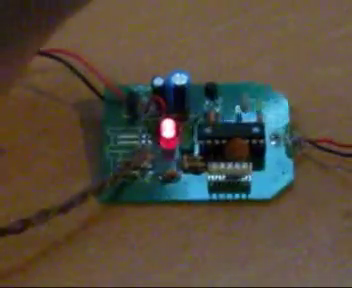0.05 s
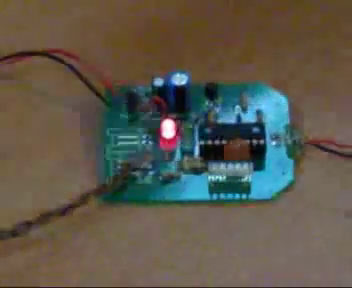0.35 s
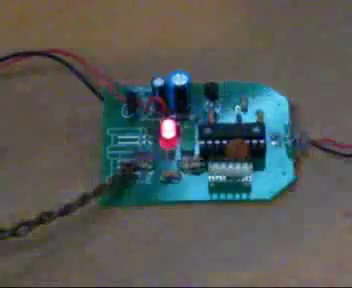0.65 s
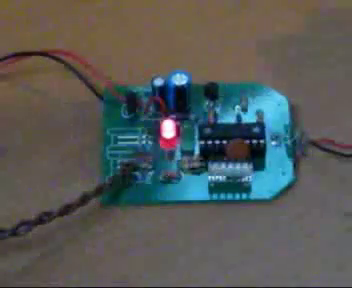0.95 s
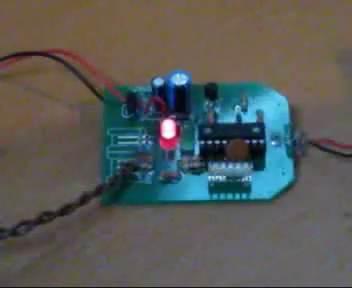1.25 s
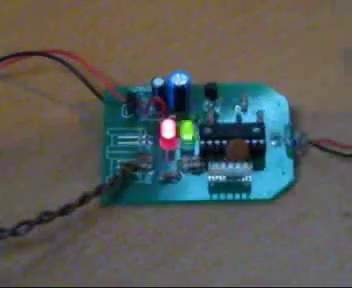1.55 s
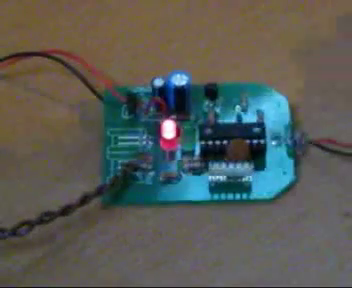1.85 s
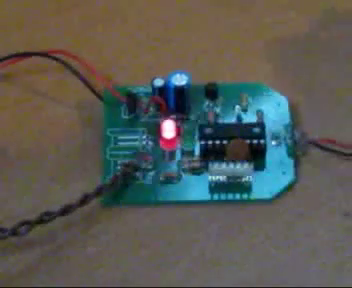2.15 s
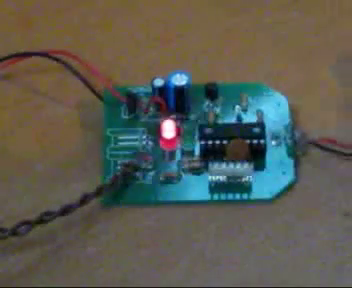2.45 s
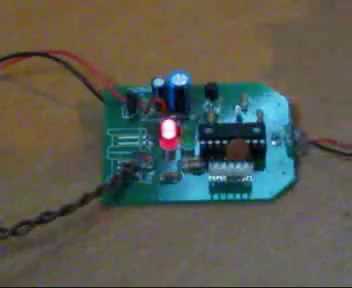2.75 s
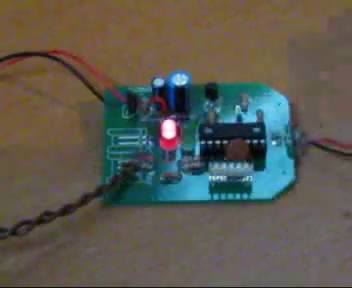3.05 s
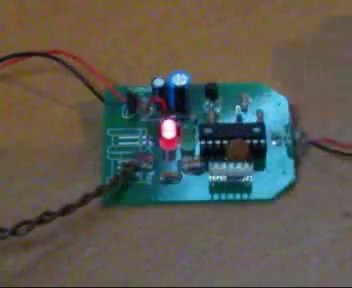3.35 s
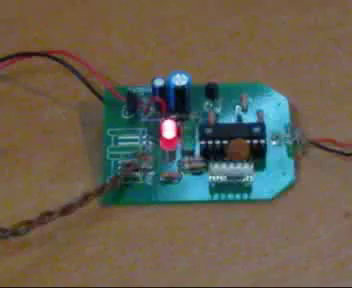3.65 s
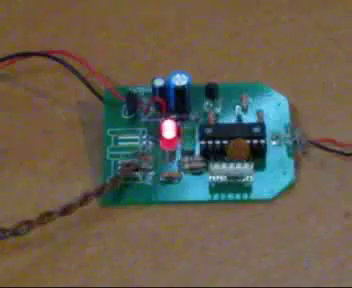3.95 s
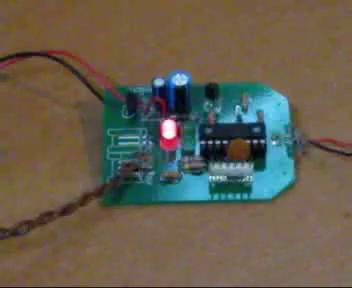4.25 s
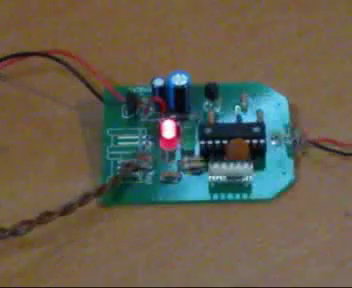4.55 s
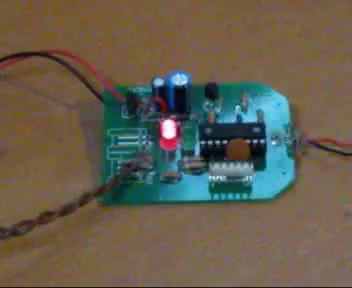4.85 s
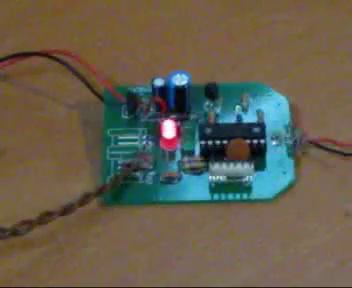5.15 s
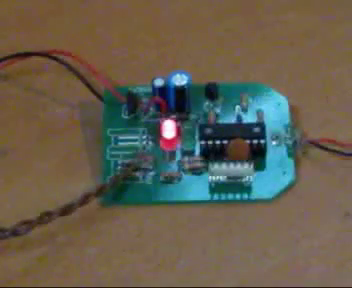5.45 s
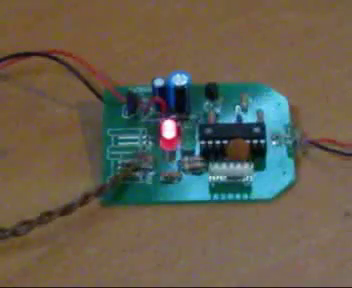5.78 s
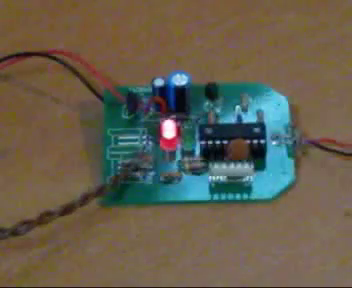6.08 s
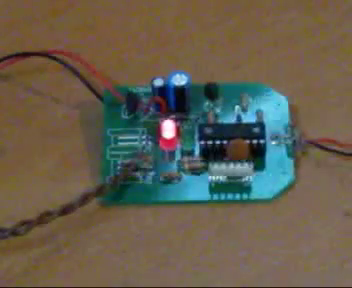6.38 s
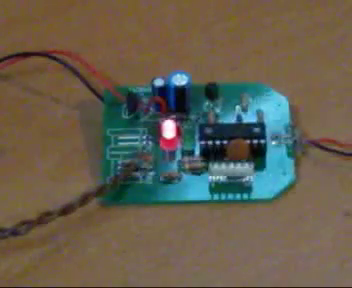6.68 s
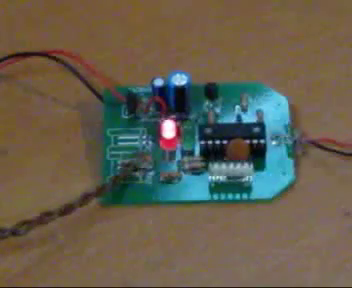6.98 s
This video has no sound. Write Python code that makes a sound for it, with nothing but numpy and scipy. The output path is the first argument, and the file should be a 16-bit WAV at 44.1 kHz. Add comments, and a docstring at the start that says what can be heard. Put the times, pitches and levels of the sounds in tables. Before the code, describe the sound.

Knuckles rap seven times on a wooden panel in a small room, in an uneven rhythm over faint hiss and low rumble.

```python
"""A faint tap over room tone: low rumble, a drone, hiss and thin electronic whine. Soft bumps and a high
rustle follow, then knuckles rap a seven-beat pattern on a wooden panel in a small room.
Each blow sets the panel's modes booming and clacking; reflections swell for some 25 ms and die away,
and something loose buzzes after two of the blows. The knocks stir up the rumble; as it settles
the drone fades, leaving the hiss, the whine and a few more soft bumps."""
import sys
import numpy as np
from scipy import signal
from scipy.fft import rfft, irfft, next_fast_len
from scipy.io import wavfile
from scipy.ndimage import uniform_filter1d

SR = 44100
rng = np.random.default_rng(int(sys.argv[2]) if len(sys.argv) > 2 else 0)


def wrap_up_sound(samples):
    """Save the sound to the file named by the first command line argument, as 16-bit audio."""
    columns = np.atleast_2d(samples).T
    # keep every value between -1 and 1, then stretch to whole-number steps
    tamed = np.clip(columns, -1, 1)
    steps = np.round(tamed * 32767).astype(np.int16)
    wavfile.write(sys.argv[1], SR, steps)


N = 309582

# Tone curves of the room rumble, the electronic hiss and its top-end fizz: f/Hz, relative density/dB
RUMBLE_EQ = [(10, -14.5), (24, -5), (36, -8.5), (56, -9.5), (80, -22.5), (130, -44.5), (300, -72)]
HISS_EQ = [(60, 5.5), (160, 1.5), (250, -1.5), (340, -13.5), (600, -10.5), (1100, -3), (2000, -9),
           (3500, -5), (5500, -5.5), (6400, -2), (7600, -4), (9500, -2.5), (12400, -35.5)]
FIZZ_EQ = [(8500, -46.5), (10000, -12.5), (11200, -9), (12200, -0.5), (13000, -12), (14500, -13.5),
           (16000, -16)]
# Thin lines of electronic whine: f/Hz, level/dB
WHINE_LINES = [(7040, -73), (8134, -69.5), (8802, -70.5), (9685, -75), (9884, -70.5), (10657, -69.5),
               (10850, -62.5), (11044, -72), (11819, -72), (12004, -62), (12319, -68)]
# Tone curve of the wash of weaker wood modes and reflections: f/Hz, relative density/dB
WOOD_EQ = [(25, -9), (70, 4.5), (170, -1), (300, 3.5), (700, -7.5), (1450, -5), (2200, -11.5), (3700, -15),
           (5200, -24.5), (11000, -30.5), (16000, -49)]
# Decay of the wash and of the strong modes; wood lets its lows hang longest: f/Hz, t60/s
WASH_T60 = [(60, 0.49), (250, 0.3), (1200, 0.28), (3500, 0.22), (9000, .2)]
MODE_T60 = [(21, .5), (45, .3), (106, .27), (230, .16), (400, .2), (1000, .2), (3500, .2)]
# Modes rung by the opening tap: f/Hz, relative level/dB
TAP_MODES = [(270, -34.5), (305, -25.5), (350, -27.5), (470, -34.5), (660, -35.5), (890, -52),
             (1190, -36.5), (1560, -38.5), (1900, -35), (2040, -41), (2400, -48), (3400, -47)]
# Soft bumps and shuffles: t/s, level/dB, f/Hz, length/s
SOFT_BUMPS = [(0.1, -53.5, 35.2, .28), (0.467, -62.5, 380, 0.081), (0.713, -45.5, 51, 0.08),
              (4.103, -61, 426, 0.15), (4.197, -62, 576, .1), (4.578, -46.5, 46.6, 0.071),
              (4.819, -47.5, 40.2, 0.13), (6.09, -63, 610, .12), (6.145, -66, 440, .11),
              (6.28, -40.5, 22.6, 0.492), (6.785, -47, 52, 0.057)]
# Strong modes of the panel and the air around it: f/Hz, relative level/dB
PANEL_MODES = [(21, -17), (40, -17.5), (51, -21.5), (106, -16), (230, -3), (246, -9.5), (282, -17.5),
               (341, -26), (392, -17.5), (426, -13), (488, -24.5), (596, -20), (693, -30), (803, -29.5),
               (885, -30), (968, -19), (1129, -27.5), (1255, -21), (1304, -23.5), (1356, -28),
               (1462, -16.5), (1497, -22), (1641, -21.5), (1720, -24), (1762, -26), (1925, -24.5),
               (2041, -28), (2528, -28.5), (2744, -31.5), (3560, -34.5)]
# The knocks, each coloured by the spot struck and the hardness of the knuckle:
# t/s, force/dB, thump/dB, hollow/dB, bark/dB, clack/dB, bite/dB, crack/dB, snap/dB
KNOCKS = [(1.235, 2.5, 2, -10.5, -1, 5.5, 5.5, 7, 12.5), (1.577, 5.5, 0, 0, -4, -0.5, 2, 2, -0.5),
          (1.743, 0, 2.5, 3.5, 4, 4.5, 4, 6.5, 3), (1.922, 5, -1, -4, -4, -2.5, -8, -10, -13),
          (2.300, 5, -2.5, 2.5, -0.5, -4, -9, -6.5, -12), (2.933, 2.5, 2, 11.5, 7.5, -8.5, -7, -11, -11),
          (3.236, 5.5, 0.5, 1, -5, -11, -0.5, -7.5, -3)]
# EQ points of a knock (thump, a flat pivot, then hollow to snap): f/Hz
KNOCK_EQ_HZ = [90, 240, 450, 800, 1400, 2100, 3500, 8000]
# Buzzes of something loose: t/s, level/dB, length/s
RATTLES = [(1.644, -38, .075), (3.289, -38, 0.073)]
# Bright tone curve of a buzz: f/Hz, relative density/dB
RATTLE_EQ = [(800, -15.5), (2200, 9.5), (4000, 1), (7000, -8), (11000, 1), (16000, -14)]
TOP_HZ = 15900


def amp(db):
    """Decibels to gain."""
    return 10 ** (np.asarray(db) / 20)


def unit_rms(x):
    """Scales to rms 1."""
    return x / np.sqrt(np.mean(x ** 2) + 1e-20)


def curve_at(points, hz):
    """Reads a curve on a log-frequency axis."""
    f, value = np.transpose(points)
    return np.interp(np.log(hz + 1), np.log(f + 1), value)


def eq(x, curve):
    """Shapes x with a tone curve of f/Hz, gain/dB."""
    size = next_fast_len(len(x) + 4096)
    gain = amp(curve_at(curve, np.fft.rfftfreq(size, 1 / SR)))
    return irfft(rfft(x, size) * gain, size)[:len(x)]


def noise(curve, count):
    """Noise of rms 1 with the given tone curve."""
    return unit_rms(eq(rng.standard_normal(count), curve))


def puff(curve, length_s):
    """Noise that fades smoothly in and out."""
    count = int(length_s * SR)
    return noise(curve, count) * np.hanning(count)


def add(mix, s, sound):
    """Mixes a sound in at s seconds."""
    part = mix[max(round(s * SR), 0):][:len(sound)]
    part += sound[:len(part)]


def drift(samples):
    """A random curve of rms 1 that wanders over about this many samples."""
    return unit_rms(uniform_filter1d(uniform_filter1d(rng.standard_normal(N), samples), samples // 4))


def wavering_tone(hz, wander_hz=3, waver_db=3):
    """A sine of rms 1 that drifts a little in pitch and level."""
    turns = np.cumsum(hz + wander_hz * drift(4000)) / SR
    return unit_rms(amp(waver_db * drift(20000)) * np.sin(2 * np.pi * turns))


def mottle(shape, bins, frames):
    """A random texture of rms 1, smoothed across frequency and time."""
    across_bands = uniform_filter1d(rng.standard_normal(shape), bins, axis=0)
    return unit_rms(uniform_filter1d(across_bands, frames, axis=1))


def uneven_noise(curve):
    """Noise whose narrow bands fade in and out, over a fine, slowly changing ripple of colour."""
    hz, _, bands = signal.stft(noise(curve, N), SR, nperseg=4096, noverlap=3584)
    patches = np.minimum(mottle(bands.shape, bins=7, frames=9), 1.3)
    grain = np.minimum(mottle(bands.shape, bins=5, frames=110), 2)
    depth = curve_at([(150, 2), (400, 2.4), (1500, 1.7), (5000, 1.2), (12000, .9)], hz)[:, None]
    bands *= amp(5.5 * depth * patches + 3.5 * grain)
    return unit_rms(signal.istft(bands, SR, nperseg=4096, noverlap=3584)[1][:N])


def rumble(t, rest_db=-56, stir_db=-38.5, settle_db_per_s=21.5):
    """Lumpy room rumble: each knock stirs it up and it settles again."""
    lumps = amp(4 * np.minimum(drift(5000), 1.5))
    stirred_power = sum((t > s) * amp(stir_db - settle_db_per_s * abs(t - s)) ** 2 for s, *_ in KNOCKS)
    return np.sqrt(amp(rest_db) ** 2 + stirred_power) * unit_rms(lumps * noise(RUMBLE_EQ, N))


def drone(t, hz=105, db=-57, hold_s=3.03, fade_db_per_s=22):
    """A faint low tone that holds until late in the knocking, then dies away."""
    level = amp(db - fade_db_per_s * np.maximum(t - hold_s, 0))
    return level * wavering_tone(hz, wander_hz=2, waver_db=3.5)


def electronics(hiss_db=-57.5, fizz_db=-53):
    """Thin wavering whine over uneven hiss, with fizz on top."""
    whine = sum(amp(db) * wavering_tone(hz) for hz, db in WHINE_LINES)
    return whine + amp(hiss_db) * uneven_noise(HISS_EQ) + amp(fizz_db) * uneven_noise(FIZZ_EQ)


def swell(t, rise_s):
    """The attack builds as reflections gather."""
    return 1 - np.exp(-(t / rise_s) ** 2)


def wood_colour():
    """The weaker modes crowd into narrow peaks and valleys, different for every spot struck."""
    hz = np.arange(20, TOP_HZ, 45)
    depth_db = 10 * curve_at([(200, .25), (700, 1), (3000, 1), (9000, .5)], hz)
    ripple = np.clip(rng.standard_normal(len(hz)), -3, 1.2)
    return np.column_stack([hz, curve_at(WOOD_EQ, hz) + depth_db * ripple])


def wash(t, early_db=5, early_s=.042, tail_db=-39, tail_t60_s=0.54):
    """Dense wood modes: strong early reflections, a decay by band, and a faint room tail."""
    hz, when, bands = signal.stft(noise(wood_colour(), len(t)), SR, nperseg=512)
    decay = amp(-60 * when / curve_at(WASH_T60, hz)[:, None])
    tail = amp(tail_db - 60 * when / tail_t60_s)
    body = signal.istft(bands * (decay + tail), SR, nperseg=512)[1][:len(t)]
    early_lift = 1 + (amp(early_db) - 1) / (1 + (t / early_s) ** 6)
    return body * early_lift * swell(t, rise_s=0.028)


def ring(t, modes, scatter_db=2):
    """The strong modes ring as damped sines, excited a little differently by every blow."""
    hz, db = np.transpose(modes)[:, :, None]
    scatter, phase = rng.standard_normal((2, len(modes), 1))
    envelopes = amp(db + scatter_db * scatter - 60 * t / curve_at(MODE_T60, hz))
    partials = envelopes * np.sin(2 * np.pi * (hz * t + phase))
    return partials.sum(0) * swell(t, rise_s=0.03)


def tap(s=.073, tick_gain_db=-41, ring_gain_db=4):
    """One light, thin tap on wood, ringing modes of its own."""
    out, t = np.zeros(N), np.arange(SR // 2) / SR
    tick = eq(wash(t), [(100, -23), (400, 15.5), (3500, 4.5), (8000, 21)])
    add(out, s, amp(tick_gain_db) * tick + amp(ring_gain_db) * ring(t, TAP_MODES))
    return out


def bumps(spread=1.096):
    """Small, soft-edged puffs, each around one low pitch."""
    out = np.zeros(N)
    for s, db, hz, length_s in SOFT_BUMPS:
        band = [(hz / spread ** 3, -90), (hz / spread, -15), (hz, 0),
                (hz * spread, -15), (hz * spread ** 4, -90)]
        add(out, s, amp(db) * unit_rms(puff(band, length_s)))
    return out


def rustle(s=0.17, length_s=0.36, db=-57, hz=14400, spread=1.08):
    """A faint, very high rustle just after the opening tap."""
    out = np.zeros(N)
    band = [(hz / spread ** 3, -70), (hz / spread, -12), (hz, 0), (hz * spread, -16)]
    add(out, s, amp(db) * puff(band, length_s))
    return out


def knocks(wash_gain_db=-13.5, shared_power=0.3):
    """Every blow rings the same panel in the same room, coloured by where and how it lands."""
    out, t = np.zeros(N), np.arange(SR // 2) / SR
    shared = wash(t)
    for s, force_db, thump_db, *upper_db in KNOCKS:
        dense = np.sqrt(shared_power) * shared + np.sqrt(1 - shared_power) * wash(t)
        blow = amp(wash_gain_db) * dense + ring(t, PANEL_MODES)
        colour = list(zip(KNOCK_EQ_HZ, [thump_db, 0] + upper_db))
        add(out, s, amp(force_db) * eq(blow, colour))
    return out


def rattles():
    """Something loose gives a short, bright buzz in the wake of two blows."""
    out = np.zeros(N)
    for s, db, length_s in RATTLES:
        add(out, s, amp(db) * puff(RATTLE_EQ, length_s))
    return out


def scene():
    """Mono mix: the hits up front, room tone and rustle underneath."""
    t = np.arange(N) / SR
    hits = tap() + knocks() + rattles() + bumps()
    room_tone = rumble(t) + drone(t) + electronics()
    return (hits + room_tone + rustle())[None]


def record(dry):
    """A soft clip rounds the loudest peaks; a steep low-pass trims the top."""
    rounded = dry / (1 + dry ** 6) ** (1 / 6)
    low_pass = signal.firwin(511, TOP_HZ, window=("kaiser", 9), fs=SR)
    return signal.oaconvolve(rounded, low_pass[None], "same")


dry = scene()
out = record(dry)
wrap_up_sound(out)
```